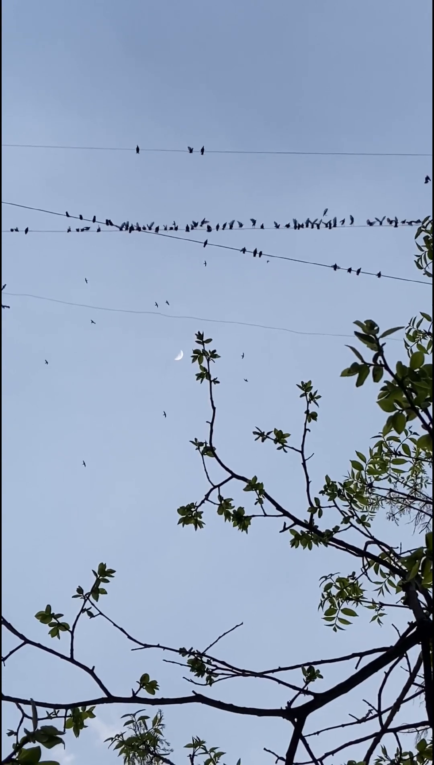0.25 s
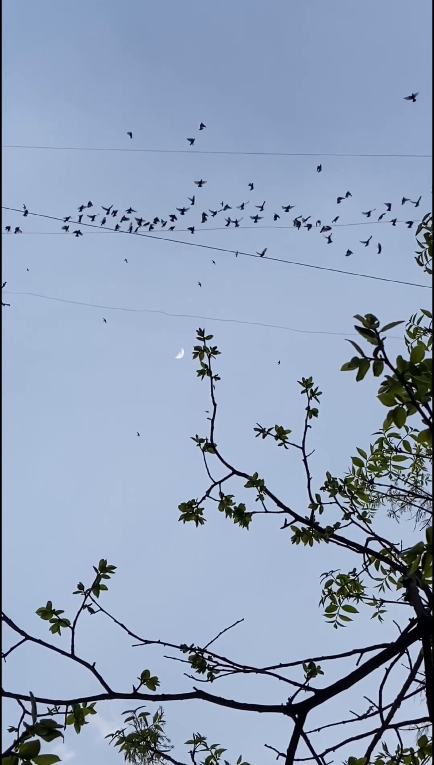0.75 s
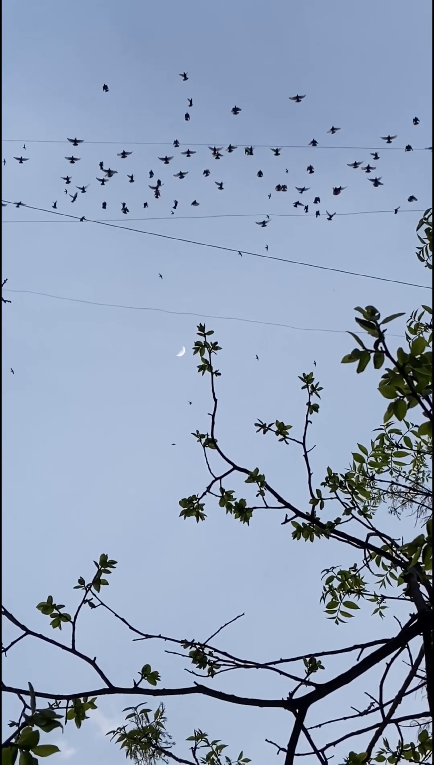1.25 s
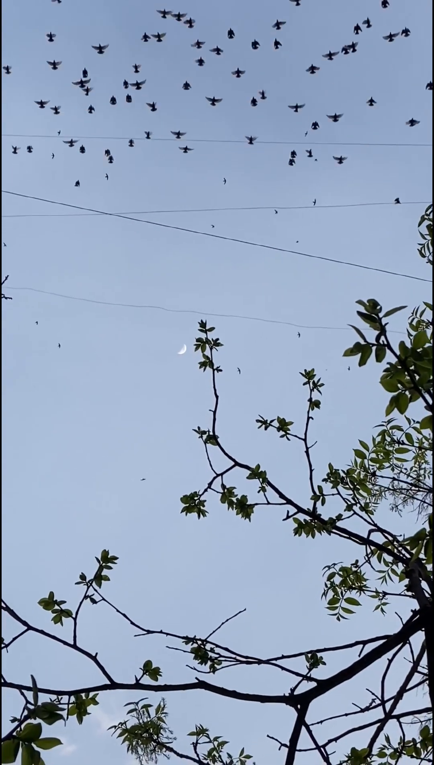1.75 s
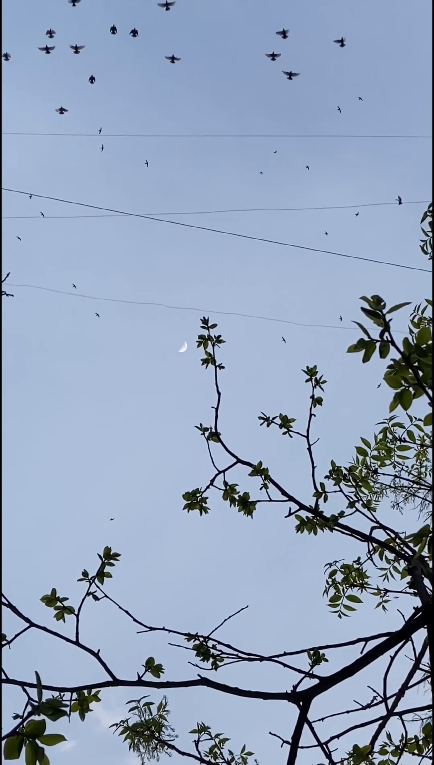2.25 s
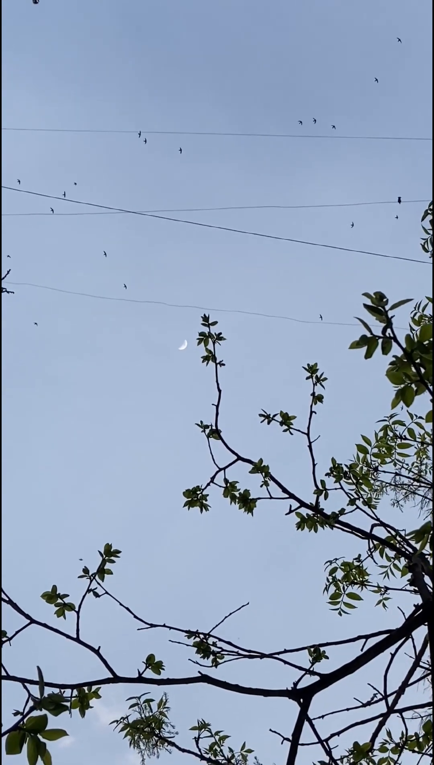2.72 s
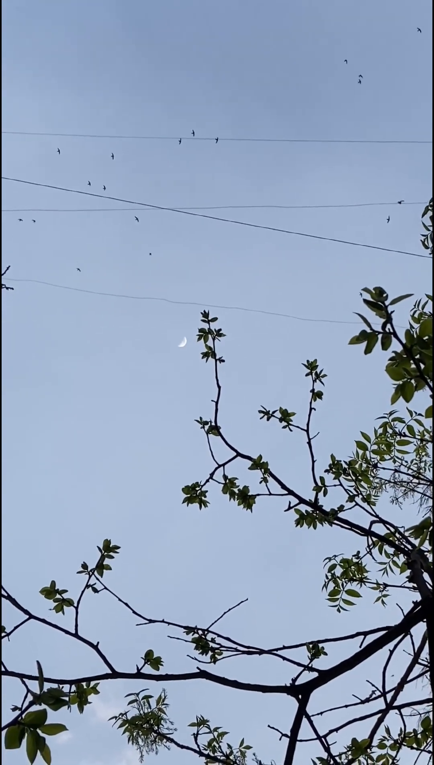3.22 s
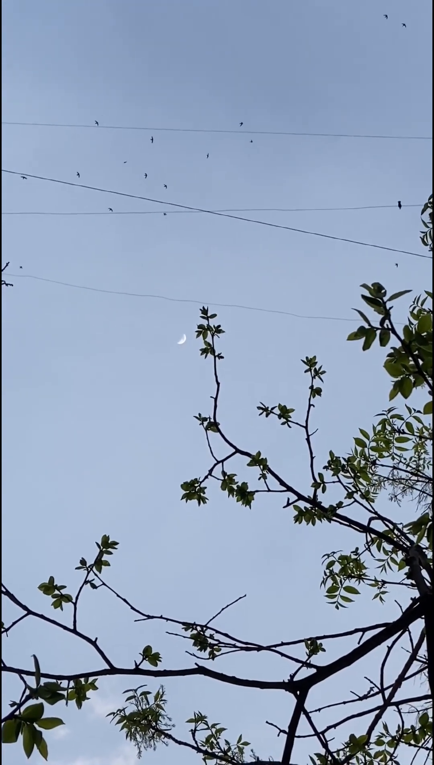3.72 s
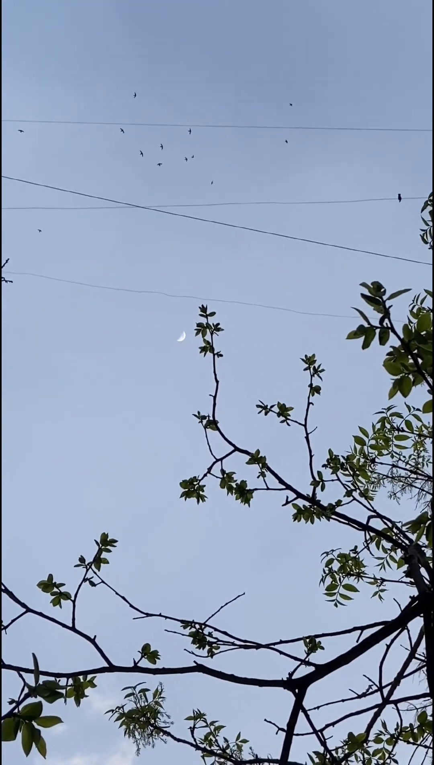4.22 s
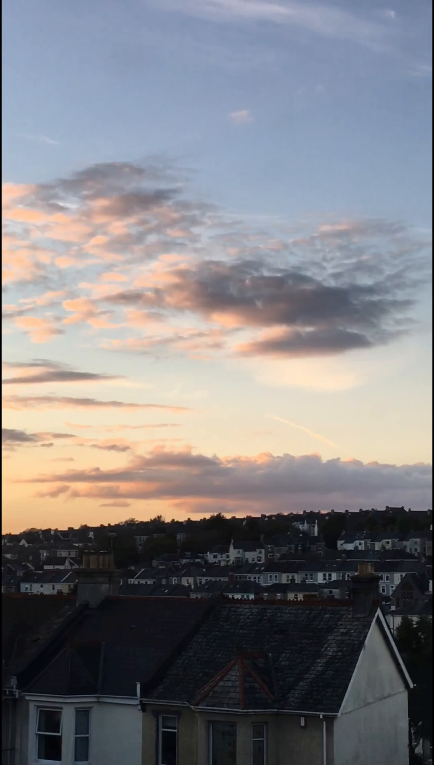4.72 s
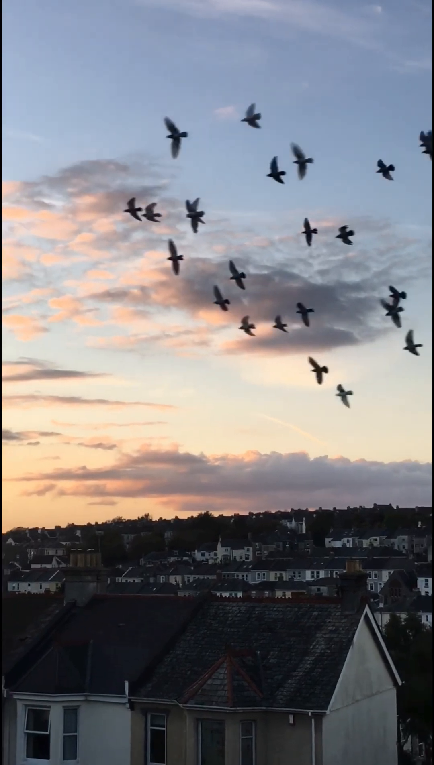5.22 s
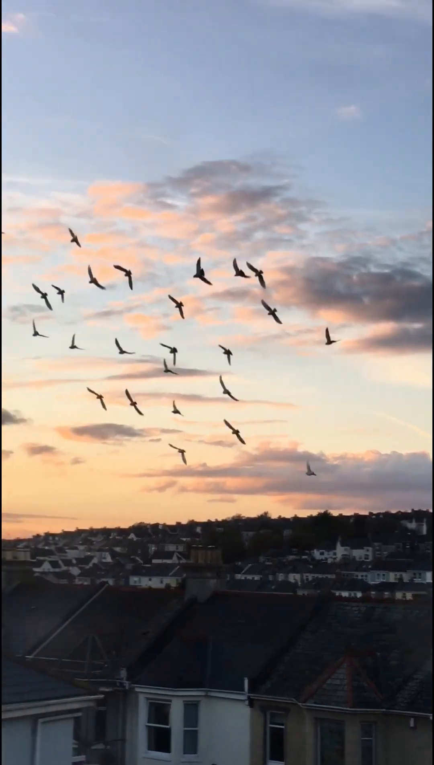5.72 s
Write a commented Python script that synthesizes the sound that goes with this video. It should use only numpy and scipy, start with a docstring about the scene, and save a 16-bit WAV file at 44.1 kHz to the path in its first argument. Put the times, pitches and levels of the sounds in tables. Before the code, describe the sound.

From 0 to 4.4 s a gull calls outdoors in wind. Echoes of earlier wails are already sounding; another wail comes at 0.3 s, then from 0.6 s nine yelps, about one every 0.3 s, later slightly wider apart. Each opens with a hoarse catch, jumps to a high held note near 1.4 to 1.5 kHz, then falls and breaks up. Strong echoes after 0.6 to 2.4 s make a small flock; soft low moans sit between. Wind rumble and sharp microphone thumps swell from 1 s, are strongest at 1.2 to 2.5 s, then subside. The last yelp is at 3.4 s, leaving echoes. A clean cut brings silence from 4.43 to 4.53 s. Then, until 6 s, jackdaws chatter densely and evenly, short hoarse arched calls in wide stereo blurred by roofs, a few nearer, with thin whistles, faint traffic, deep breeze and a very faint airy wing swish near 5.35 s.

```python
"""A gull gives its long call in gusty wind: a few wails, then a run of yelps, with low moans between.
The voice is a set of harmonics through throat resonances with hoarse breaks, the wind is shaped noise
with sharp buffets on the microphone, and both come back in strong echoes, so one bird sounds like several.
After a brief silence a flock of jackdaws, many short arched calls, chatters over the roofs of a town;
noise makes the far traffic, the breeze and a swish of wings overhead."""
import sys
import numpy as np
from scipy import signal
from scipy.fft import rfft, irfft, next_fast_len
from scipy.io import wavfile
from scipy.ndimage import uniform_filter1d, map_coordinates

SR = 44100
rng = np.random.default_rng(int(sys.argv[2]) if len(sys.argv) > 2 else 0)


def wrap_up_sound(samples):
    """Save the sound to the file named by the first command line argument, as 16-bit audio."""
    columns = np.atleast_2d(samples).T
    # keep every value between -1 and 1, then stretch to whole-number steps
    tamed = np.clip(columns, -1, 1)
    steps = np.round(tamed * 32767).astype(np.int16)
    wavfile.write(sys.argv[1], SR, steps)


N = 263277
TIME = np.arange(-SR, N) / SR  # seconds; starts a second early: earlier notes are still echoing
FLOCK_START = 4.524  # s
# How the flock and the breeze over the roofs rise and fall. Each row: time in seconds, then relative
# levels in dB of the chatter, the treble of the chatter and the wind.
FLOCK_LEVELS = [(4.54, -40.5, -45.5, -30.5), (4.85, -38.5, -48.5, -31.5), (5.05, -41, -53.5, -31.5),
                (5.4, -38, -47, -39.5), (5.8, -38, -47, -29.5), (5.96, -42.5, -48, -32)]


def amp(db):
    """Decibels to an amplitude factor."""
    return 10 ** (np.asarray(db) / 20)


def unit(x):
    """The sound at rms 1."""
    return x / np.sqrt(np.mean(x ** 2) + 1e-20)


def along(points, hz):
    """(Hz, value) points read on a log frequency axis."""
    f, v = np.transpose(points)
    return np.interp(np.log(hz + 1), np.log(f + 1), v)


def curves(rows, t):
    """Each column after the time, read at the times t."""
    s, *cols = np.transpose(rows)
    return [np.interp(t, s, c) for c in cols]


def wobble(rate, size):
    """A smooth random curve, rate knots a second."""
    knots = rng.standard_normal(int(size * rate / SR) + 4)
    return map_coordinates(knots, [np.arange(size) * rate / SR])


def filtered(x, response):
    """The sound times a response of frequency."""
    size = x.shape[-1]
    m = next_fast_len(size + 8192)
    return irfft(rfft(x, m) * response(np.fft.rfftfreq(m, 1 / SR)), m)[..., :size]


def coloured(x, spectrum):
    """The sound through a (Hz, dB) spectrum, at rms 1."""
    return unit(filtered(x, lambda hz: amp(along(spectrum, hz))))


def stereo_noise(spectrum, side_db):
    """Coloured noise with a weaker side part."""
    mid, side = coloured(rng.standard_normal((2, len(TIME))), spectrum)
    return mid + amp(side_db) * np.array([side, -side])


def gate(t, start, end, fade):
    """1 between start and end, with soft edges centred on both."""
    return np.sin(np.pi / 2 * np.clip(np.minimum(t - start, end - t) / fade + .5, 0, 1)) ** 2


def add(track, s, sound):
    """Mix a sound in at time s."""
    part = track[..., max(round((s + 1) * SR), 0):][..., :sound.shape[-1]]
    part += sound[..., :part.shape[-1]]


def phase_of(pitch):
    """Phase in radians of a voice that follows a pitch in Hz."""
    return 2 * np.pi * np.cumsum(pitch) / SR


def reverb(x, t60, channels):
    """Diffuse outdoor tail: decaying noise of unit energy."""
    t = np.arange(SR * 3 // 4) / SR
    tail = rng.standard_normal((channels, len(t))) * amp(-60 * t / t60)
    tail /= np.linalg.norm(tail[0])
    return signal.fftconvolve(np.atleast_2d(x), tail, axes=1)[:, :x.shape[-1]]


def rasp(length, pitch_hz=1110, fall_hz_per_s=0, jitter=.035, flutter_db=4, split_db=-9, hiss_db=-2):
    """The syrinx stutters: its pitch wanders and splits into thirds, with air rushing through."""
    # Colour of the hoarse voice. Each row: frequency in Hz, relative level in dB.
    rasp_colour = [(300, -42), (750, -1), (1150, 5.5), (1650, -3.5), (2400, -8.5), (3200, -7),
                   (4200, -21.5), (5500, -41)]
    t = np.arange(int((length + .02) * SR)) / SR
    phase = phase_of((pitch_hz - fall_hz_per_s * t) * np.exp(jitter * wobble(150, len(t))))
    # whole harmonics at full strength, the thirds between them weaker
    buzz = sum(amp(split_db * (k % 3 > 0)) * np.cos(k * phase / 3) for k in range(2, 13))
    stutter = amp(flutter_db * wobble(110, len(t)))
    hiss = amp(hiss_db) * rng.standard_normal(len(t))
    return coloured((buzz + hiss) * stutter, rasp_colour) * gate(t, .008, length + .008, .016)


def cry(pitch, low_db, high_db, tilt_db, jitter=0.0046, shimmer_db=1.08):
    """A harmonic cry, shakiest at first, whose partials sweep through the throat's resonances."""
    # Weight of the gull's overtones. Each row: frequency in Hz, relative level in dB.
    throat = [(2000, -3), (2300, -4), (2500, 1.5), (2850, 1.5), (3450, 2.5), (3750, -12.5), (3880, -8),
              (4080, -3), (4400, -15.5), (4620, -8), (4850, -24.5), (5020, -39.5), (5300, -23),
              (5700, -45.5)]
    # Weight of the gull's fundamental. Each row: frequency in Hz, relative level in dB.
    low_throat = [(950, -16.5), (1060, 0), (1150, 1.5), (1260, -2.5), (1350, -1), (1440, -8), (1500, -10.5)]
    shaky_start, settle_s = 2.7, 0.024  # extra unsteadiness as a note sets in, and how fast it settles
    attack_db, attack_s = -6.5, 0.0055  # every note swells in
    release_db, release_s = -18.5, 0.0031  # the overtones die away before the note ends
    t = np.arange(len(pitch)) / SR
    shaky = 1 + shaky_start * np.exp(-t / settle_s)
    pitch = pitch * (1 + jitter * shaky * wobble(350, len(t)))
    phase = phase_of(pitch)
    orders = np.arange(2, 6)[:, None]
    # tilt_db: a step from one overtone to the next
    weights = amp(along(throat, orders * pitch) + tilt_db * (orders - 2))
    overtones = (weights * np.sin(orders * phase)).sum(0)
    fundamental = amp(low_db + along(low_throat, pitch)) * np.sin(phase)
    ending_db = release_db * np.exp((t - t[-1]) / release_s)
    tone = fundamental + amp(high_db + ending_db) * overtones
    swell_db = attack_db * np.exp(-t / attack_s) + shimmer_db * shaky * wobble(140, len(t))
    return np.sqrt(2) * tone * amp(swell_db) * gate(t, .002, t[-1] - .002, .004)


def wail(length, pitch_hz, rise, low_db, high_db, crescendo_db=2):
    """A smooth, gently arched note that slides up, brightens as it goes, then sags and dies away."""
    rise_s = .045
    sag, sag_s = .19, .014  # the final sag as a share of the pitch
    ending_db, ending_s = -9, 0.0091
    t = np.arange(int(length * SR)) / SR
    slide = rise * np.exp(-(t / rise_s) ** 2)
    pitch = pitch_hz * (1 - slide - sag * np.exp((t - length) / sag_s))
    fade_db = ending_db * np.exp((t - length) / ending_s)
    brighten_db = crescendo_db * (t / length - .5)
    return cry(pitch, low_db + fade_db, high_db + fade_db / 2 + brighten_db,
               tilt_db=-1.5, jitter=0.0034, shimmer_db=0.7)


def yelp(length, scoop, hitch, knee, top_hz, fall_hz, low_db, high_db, scoop_db, break_s):
    """The voice scoops or jumps to a high held note, falls ever more slowly and collapses at the end."""
    scoop_hz_per_s, scoop_hz = 14000, 378.5  # slope and greatest depth of the scoop
    creep_hz_per_s, knee_s = 200, 0.0031  # the held top creeps upward, then bends into the fall
    step_share, step_s, fall_s = .3, .012, .1  # each fall opens with a quick step
    full_collapse_hz, collapse_s = 420, 0.005
    gentle_break_s = 0.02  # the longer the break, the smaller the collapse
    hitch_db, hitch_overtones_db = -8.5, -9.5  # the voice drops out as it jumps to the top pitch
    accent_db, accent_s = 3.5, 0.011  # and comes back with a bright accent
    held_db, swell_s, fade_db_per_s = -5, 0.0045, 22.5  # overtones: weaker on the held top, then fading
    taper_db, taper_share = -14.5, .5  # they taper off over this share of the length of the break
    yelp_tilt_db, push_db = -6, 6
    push_after_s, push_s = 0.046, 0.029  # brightest in a push just after the fall begins
    usual_top_hz, bright_db_per_hz = 1467, 0.08  # higher yelps are brighter on the held top

    t = np.arange(int(length * SR)) / SR
    falling = knee_s * np.logaddexp(0, (t - knee) / knee_s)  # time since the fall began, round corner
    rise_hz = np.minimum(scoop_hz_per_s * np.maximum(scoop - t, 0), scoop_hz)
    creep_hz = creep_hz_per_s * np.maximum(knee - t, 0)
    quick_step = step_share * np.exp(-falling / step_s)
    slow_fall = (1 - step_share) * np.exp(-falling / fall_s)
    drop_hz = fall_hz * (1 - quick_step - slow_fall)
    collapse_hz = full_collapse_hz * np.exp((t - length) / collapse_s - break_s / gentle_break_s)
    pitch = top_hz - rise_hz - creep_hz - drop_hz - collapse_hz

    on_top = gate(t, scoop, 1, .004)
    dropout = gate(t, scoop - hitch, scoop, .004) * (hitch > 0)
    onset_db = scoop_db * (1 - on_top) + hitch_db * dropout
    accent = (hitch > 0) * on_top * np.exp(-((t - scoop) / accent_s) ** 2)
    overtones_db = accent_db * accent + hitch_overtones_db * dropout
    swell_db = held_db * np.exp(-falling / swell_s) - fade_db_per_s * falling
    swell_db += taper_db * np.exp((t - length) / (taper_share * break_s))
    effort = np.exp(-((t - knee - push_after_s) / push_s) ** 2)  # the bird pushes hardest during the fall
    held_bright_db = bright_db_per_hz * (top_hz - usual_top_hz) * (1 - effort) * (t < knee + push_after_s)
    tilt_db = yelp_tilt_db + push_db * effort + held_bright_db
    return cry(pitch, low_db + onset_db, high_db + onset_db + overtones_db + swell_db, tilt_db)


def moan(length, start_hz, end_hz, resonance_hz, jitter, sharpness=2.8):
    """A low, gravelly note: harmonics through one throat resonance."""
    scoop, scoop_s, entry_db = .16, .022, -12  # starts softly, and flat by a share of its pitch
    t = np.arange(int(length * SR)) / SR
    entry = np.exp(-t / scoop_s)
    unsteady = 1 + jitter * (.5 * wobble(25, len(t)) + wobble(300, len(t)))
    phase = phase_of(np.linspace(start_hz, end_hz, len(t)) * (1 - scoop * entry) * unsteady)
    tone = 0
    for k in range(1, 12):
        ratio = k * end_hz / resonance_hz
        tone = tone + np.sin(k * phase) / np.hypot(1, sharpness * (ratio - 1 / ratio))
    gravel = amp(2 * wobble(130, len(t)) + entry_db * entry)
    return unit(tone * gravel) * gate(t, .01, length - .01, .02)


def gull(rasp_db=-3, tail_db=-22):
    """Each wail and yelp opens with a hoarse catch and breaks up again as the pitch drops."""
    # The opening wails. Each row: start in seconds, length in seconds, pitch in Hz, upward slide as a
    # share of the pitch, then relative levels in dB of the fundamental, the overtones and the catch.
    wail_notes = [(-.675, .145, 1165, 0.035, -39, -55.5, -40.5), (-.376, .139, 1152, .02, -30, -39, -30),
                  (-.029, .146, 1156, 0.025, -30, -37.5, -29.5),
                  (.284, .166, 1250, .045, -26, -34.5, -31.5)]
    # The run of yelps. Each row: start, length, scoop, hitch and start of the fall in seconds, top pitch
    # in Hz, fundamental, overtones, scoop against the rest and catch in relative dB, break in seconds,
    # break in relative dB.
    yelp_notes = [ (.595, 0.18, .027, .013, 0.12, 1422, -20.5, -33.5, -10, -30, .014, -35),
                  (0.893, 0.16, .040, 0.018, 0.098, 1437, -21.5, -32, -8, -30, .013, -33),
                  (1.201, 0.17, .032, 0.013, 0.11, 1451, -23, -31, -3, -27.5, 0.014, -34.5),
                  (1.514, .170, .034, 0.014, 0.1, 1462, -24, -30.5, -2, -29.5, 0.014, -34),
                  (1.854, 0.17, .021, 0.0061, 0.084, 1486, -23.5, -29, 1.5, -29.5, 0.015, -32.5),
                  (2.194, 0.17, .021, 0.012, 0.088, 1488, -25.5, -30, 4.5, -29.5, 0.023, -39),
                  (2.532, .187, .024, 0, .093, 1494, -27, -31, -1, -31.5, .024, -40),
                  (2.912, .200, .027, 0, 0.09, 1490, -27, -32, -0.5, -32.5, .036, -42.5),
                  (3.406, 0.17, .024, 0, 0.072, 1515, -32, -33, -1.5, -34.5, 0.05, -43.5)]
    # Soft low moans between the notes. Each row: start in seconds, length in seconds, start pitch in Hz,
    # end pitch in Hz, resonance in Hz, pitch jitter as a share, level in dB.
    moan_notes = [(-.513, .096, 374.4, 401.5, 1445, 0.0031, -42.5),
                  (0.492, 0.11, 399.8, 398, 820, 0.0063, -44.5),
                  (2.092, 0.225, 189.9, 211.8, 685, .016, -40.5),
                  (3.598, .17, 193.9, 207.2, 744.3, 0.018, -57)]
    first_fall_hz, deepen_hz_per_s = 232.5, 68  # depth of a fall at time 0; falls deepen through the run
    wail_catch_s, yelp_catch_s, catch_overlap_s = 0.036, .022, .008  # the catch runs into the note
    wail_break_db, wail_break_s = -17, 0.021  # the break that ends a wail, against its fundamental
    wall_s, wall_db = .036, -16.5  # a nearby wall repeats every note

    voice = np.zeros(len(TIME))
    notes = []
    for s, length, hz, rise, low_db, high_db, catch_db in wail_notes:
        note = wail(length, hz, rise, low_db, high_db)
        notes.append((s, note, wail_catch_s, catch_db, wail_break_s, low_db + wail_break_db))
    for (s, length, scoop, hitch, knee, hz, low_db, high_db,
         scoop_db, catch_db, break_s, break_db) in yelp_notes:
        fall_hz = first_fall_hz + deepen_hz_per_s * s
        note = yelp(length, scoop, hitch, knee, hz, fall_hz, low_db, high_db, scoop_db, break_s)
        notes.append((s, note, yelp_catch_s, catch_db, break_s, break_db))
    for s, note, catch_s, catch_db, break_s, break_db in notes:
        add(voice, s + catch_overlap_s - catch_s - .008, amp(catch_db + rasp_db) * rasp(catch_s))
        add(voice, s, note)
        croak = rasp(break_s, pitch_hz=1070, fall_hz_per_s=7500, jitter=.025,
                     split_db=-12.5, hiss_db=-7, flutter_db=1.5)
        add(voice, s + len(note) / SR - .012, amp(break_db) * croak)
    for s, length, start_hz, end_hz, resonance_hz, jitter, db in moan_notes:
        add(voice, s, amp(db) * moan(length, start_hz, end_hz, resonance_hz, jitter))
    wall = amp(wall_db) * np.interp(TIME - wall_s, TIME, voice)
    return voice + wall + amp(tail_db) * reverb(voice, t60=.45, channels=1)[0]


def wind(rumble_db=-9, rumble_growth=0.61, push_db=6.0, flutter_db=-5, buffet_db=-2, air_db=-54,
         thump_t60=0.11):
    """Gusts on the microphone over far air: the harder the gust, the more buffeting over the rumble."""
    # The wind rises to one long, uneven gust and drops again. Each row: time in seconds, strength in
    # relative dB.
    gusts = [(-.56, -41.5), (-.45, -41.5), (-.15, -45.5), (.55, -48.5), (.86, -47), (1, -38), (1.14, -46),
             (1.22, -33), (1.5, -36), (1.95, -35), (2.28, -30.5), (2.5, -32.5), (2.7, -43.5), (3.3, -53),
             (3.8, -59.5)]
    # Deep rumble. Each row: frequency in Hz, relative level in dB.
    rumble_colour = [(10, -16), (20, 10), (80, 5), (135, 2.5), (220, -43.5)]
    # Lumpy buffeting. Each row: frequency in Hz, relative level in dB.
    buffet_colour = [(80, -40.5), (145, 4), (200, 1.5), (300, -4.5), (450, -12), (700, -19.5),
                     (1500, -51.5)]
    # Steady far air. Each row: frequency in Hz, relative level in dB.
    shore_air = [(1200, 2), (1900, -4.5), (3000, -5), (4200, -6), (5400, -18)]
    # Sharp buffets on the microphone. Each row: start in seconds, relative level in dB, centre in Hz.
    thumps = [(-.522, -29, 280), (-.5, -32.5, 170), (-.477, -29.5, 111), (-.442, -36, 161),
              (-.417, -33.5, 217), (-.292, -31, 155), (-.24, -35.5, 170), (.933, -36, 150),
              (.985, -29, 149.3), (1.195, -26.5, 152.5), (1.233, -27.5, 150), (1.291, -24.5, 160),
              (1.396, -23.5, 154.5), (1.454, -30.5, 180), (1.576, -27.5, 149.5), (1.638, -26.5, 149.3),
              (1.676, -26.5, 150), (1.749, -31, 160), (1.831, -23, 160), (2.018, -27, 150),
              (2.094, -23.5, 377), (2.145, -28, 151), (2.242, -28, 164.6), (2.278, -24.5, 152),
              (2.333, -26, 170), (2.406, -27.5, 171), (2.478, -30, 150), (3.135, -32.5, 149.8)]
    gust_db, = curves(gusts, TIME)
    size = len(TIME)

    def noise(spectrum):
        """Coloured noise for the whole length."""
        return coloured(rng.standard_normal(size), spectrum)

    rumble = unit(noise(rumble_colour) * amp(1.8 * wobble(14, size)))
    low = amp(rumble_growth * gust_db + rumble_db) * rumble
    lumps = amp(gust_db + buffet_db) * unit(noise(buffet_colour) * amp(4.5 * wobble(45, size)))
    t = np.arange(SR // 8) / SR
    for s, db, hz in thumps:  # an eddy strikes the port and dies at once
        u = 2 * np.pi * hz * t - np.pi
        add(lumps, s, -amp(db + push_db) * u * np.exp((1 - u ** 2) / 2))
        decay = amp(db + flutter_db - 60 * t / thump_t60) * (1 - np.exp(-t / 0.00071))
        add(lumps, s, decay * coloured(rng.standard_normal(len(t)), buffet_colour))
    return low + lumps + amp(air_db) * noise(shore_air)


def echoed(x):
    """Whole repeats of the sound, each with its own strength and sign on either side."""
    # The direct sound and its echoes. Each row: delay in seconds, left gain, right gain (factors).
    echoes = [(0, 0.94, -0.99), (.643, -1.03, -0.92), (.857, 0.046, 0.49), (1.5, 0.48, 0.21),
              (2.143, -0.27, -0.25), (2.357, 0.053, 0.16)]
    gull_top_hz = 5500
    out = np.zeros((2, len(TIME)))
    for delay, left, right in echoes:
        add(out, delay - 1, np.outer([left, right], x))  # TIME starts at -1 s
    return filtered(out, lambda hz: 1 / np.hypot(1, (hz / gull_top_hz) ** 100))


def caw(length, start_hz, end_hz, arch=0.018, jitter=0.0046, slope_db=-3):
    """A jackdaw's short arched 'kya', built of harmonics from the second up."""
    u = np.linspace(0, 1, int(length * SR))
    bend = arch * (np.sin(np.pi * u) - .5) + jitter * wobble(398.4, len(u))
    phase = phase_of((start_hz + (end_hz - start_hz) * u) * (1 + bend))
    tone = sum(amp(slope_db * (k - 2)) * np.sin(k * phase) for k in range(2, 8))
    return unit(tone * gate(u, 0.067, 0.99, 0.1))


def jackdaws(count=440, chatter_db=-1.5, treble_db=0.0, wet_db=-8, spread=0.63, near_db=-1):
    """Many birds call one over another; the roofs blur them into an even chatter."""
    # Colour of the far chatter. Each row: frequency in Hz, relative level in dB.
    chatter_colour = [(900, -20), (1150, -10.5), (1400, -6.5), (1550, -5), (1750, -3), (2400, -9.5),
                      (3500, -14.5), (5000, -23), (6200, -29), (7500, -40.5), (9000, -50)]
    # Nearer jackdaws that stand out. Each row: start in seconds, length in seconds, start pitch in Hz,
    # end pitch in Hz, relative level in dB.
    near_caws = [(4.521, 0.097, 771, 860, -40.5), (4.8, .115, 1040, 1110, -45.5),
                 (5.24, 0.071, 1020, 1006, -46.5), (5.36, 0.11, 965, 927, -48.5),
                 (5.62, 0.063, 900, 928, -43.5), (5.716, 0.095, 846, 774, -42.5)]
    # Thin far whistles. Each row: start in seconds, length in seconds, start pitch in Hz, end pitch
    # in Hz, level in dB.
    far_whistles = [(4.62, 0.13, 3610, 3420, -47), (4.78, .07, 3280, 2960, -47),
                    (5.1, 0.074, 2890, 2870, -42.5), (5.21, 0.17, 2630, 3040, -47),
                    (5.366, 0.1, 3380, 3510, -45)]
    crowd_jitter, crowd_rasp_db = .012, 2.5  # hoarse voices: unsteady pitch (share) and level

    crowd, near = np.zeros((2, len(TIME))), np.zeros(len(TIME))
    starts = np.linspace(FLOCK_START - .2, N / SR, count)
    pitches, traits = rng.standard_normal(count), rng.uniform(-1, 1, (count, 4))
    for s, pitch, (size, glide, place, loud) in zip(starts, pitches, traits):
        start_hz = 900 * np.exp(.2 * pitch)
        end_hz = start_hz * np.exp(0.0796 * glide)
        call = caw(.075 * np.exp(.5 * size), start_hz, end_hz, arch=0.04, jitter=crowd_jitter, slope_db=1.0)
        call = call * amp(crowd_rasp_db * wobble(260, len(call)))
        add(crowd, s, amp(6.7 * loud) * np.outer([1 + spread * place, 1 - spread * place], call))
    crowd = coloured(crowd + amp(wet_db) * reverb(crowd, t60=0.42, channels=2), chatter_colour)
    body = filtered(crowd, lambda hz: 1 / (1 + (hz / 2900) ** 8))

    def even(x):
        """Level out the swells over a fifth of a second."""
        return x / np.sqrt(np.abs(uniform_filter1d(x.mean(0) ** 2, SR // 5)) + 1e-6)

    body_db, high_db, _ = curves(FLOCK_LEVELS, TIME)
    for s, length, start_hz, end_hz, db in near_caws:
        add(near, s, amp(db + near_db) * caw(length, start_hz, end_hz, slope_db=-11.5))
    for s, length, start_hz, end_hz, db in far_whistles:
        size = int(length * SR)
        pitch = np.linspace(start_hz, end_hz, size) * (1 + 0.0053 * wobble(185, size))
        add(near, s, amp(db) * np.hanning(size) * np.sin(phase_of(pitch)))
    chatter = amp(body_db + chatter_db) * even(body) + amp(high_db + treble_db) * even(crowd - body)
    return chatter + near + amp(wet_db) * reverb(near, t60=0.91, channels=2)


def rooftops(town_db=-51, breeze_db=0, wings_db=5):
    """Far traffic, a breeze on the microphone and wings passing overhead, all of shaped noise."""
    # Far traffic. Each row: frequency in Hz, relative level in dB.
    town_colour = [(100, -4), (400, -4.5), (1000, -8.5), (2500, -14.5), (6000, -50), (10000, -51)]
    # Breeze on the microphone. Each row: frequency in Hz, relative level in dB.
    breeze_colour = [(8, -13), (14, 0.5), (35, -9), (70, -20.5), (150, -33), (350, -74)]
    # The wings come and go. Each row: time in seconds, relative level in dB.
    wing_levels = [(5.28, -80), (5.35, -60.5), (5.41, -63.5), (5.47, -68), (5.62, -80.5)]
    # Swish of the feathers. Each row: frequency in Hz, relative level in dB.
    swish_colour = [(2000, -10), (5000, -3), (8500, 2), (10000, -5), (11500, -22), (14500, -10),
                    (15500, -11)]
    wind_db = curves(FLOCK_LEVELS, TIME)[2]
    breeze = amp(wind_db + breeze_db) * stereo_noise(breeze_colour, side_db=-17.0)
    wing_db = curves(wing_levels, TIME)[0] + wings_db + 1.5 * wobble(35, len(TIME))
    beats = amp(wing_db) * gate(TIME, 5.22, 5.68, .08)
    traffic = amp(town_db) * stereo_noise(town_colour, side_db=-5.0)
    return breeze + traffic + beats * stereo_noise(swish_colour, side_db=-10.5)


def scene():
    """The gull in the wind, a brief silence, then the jackdaws over the town."""
    gull_end = 4.433  # s
    shore = echoed(gull() + wind()) * gate(TIME, -1, gull_end, 0.0012)
    town = (jackdaws() + rooftops()) * gate(TIME, FLOCK_START + 0.0097, 7, 0.027)
    return (shore + town)[:, SR:]  # drop the early second


def record(dry):
    """Nothing is kept above the band limit."""
    top_hz = 15500
    return filtered(dry, lambda hz: hz < top_hz)


dry = scene()
out = record(dry)
wrap_up_sound(out)
```